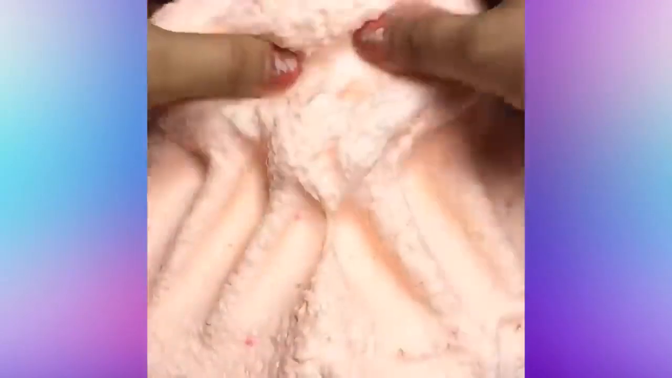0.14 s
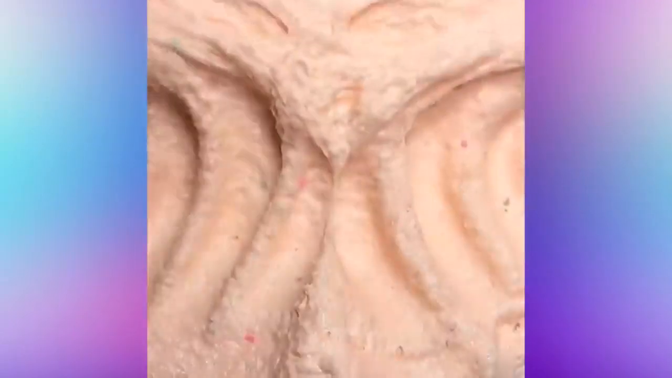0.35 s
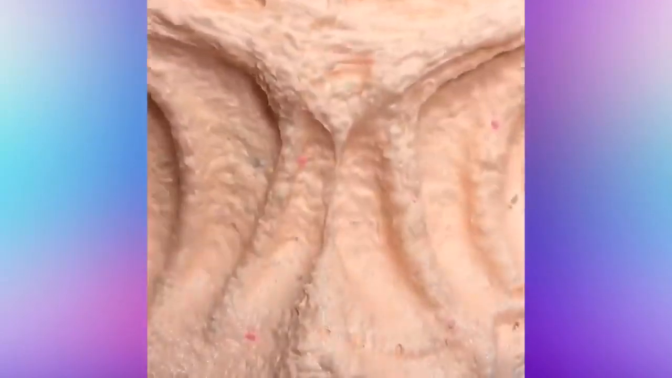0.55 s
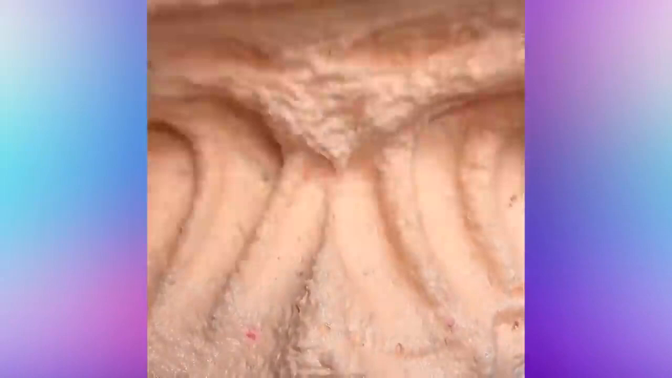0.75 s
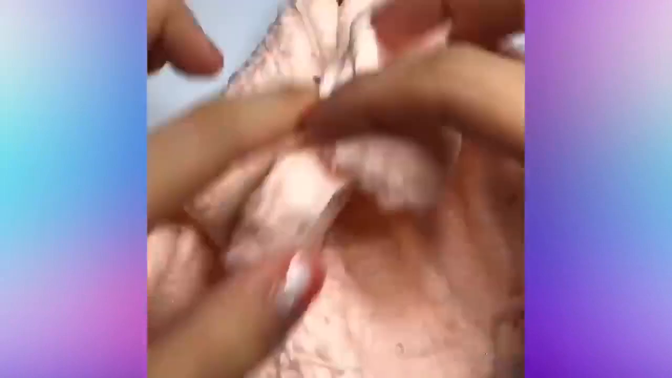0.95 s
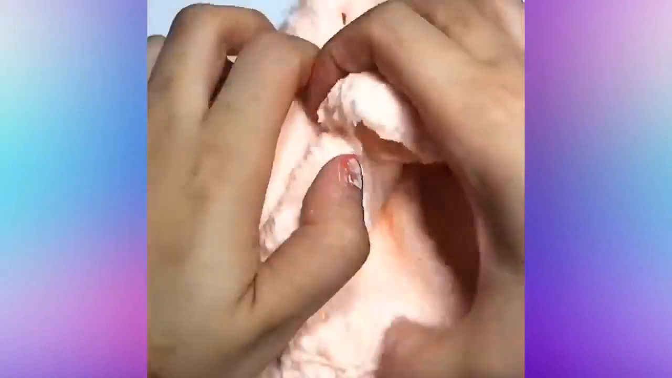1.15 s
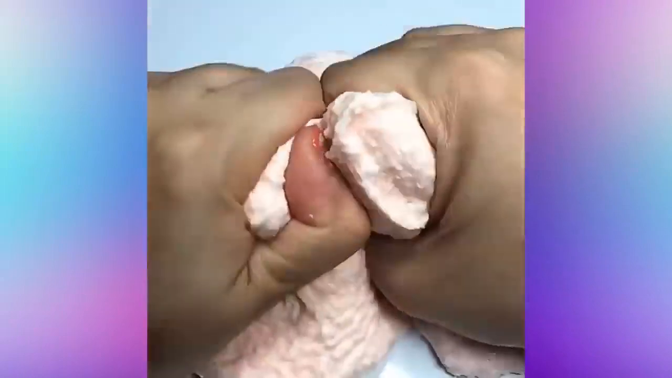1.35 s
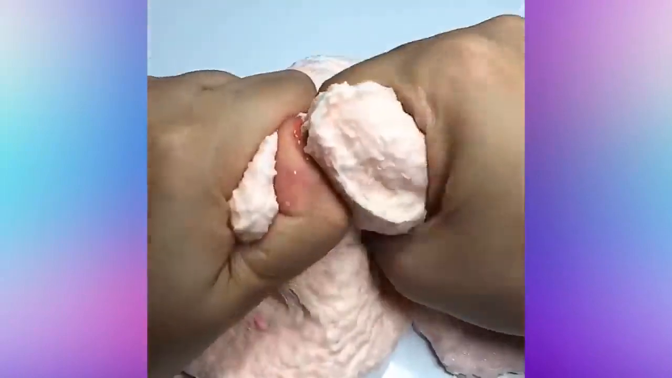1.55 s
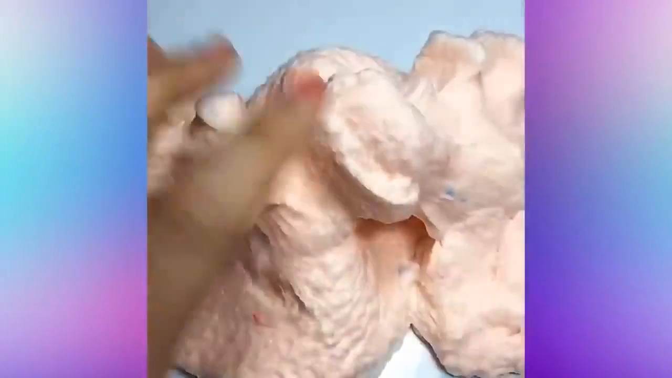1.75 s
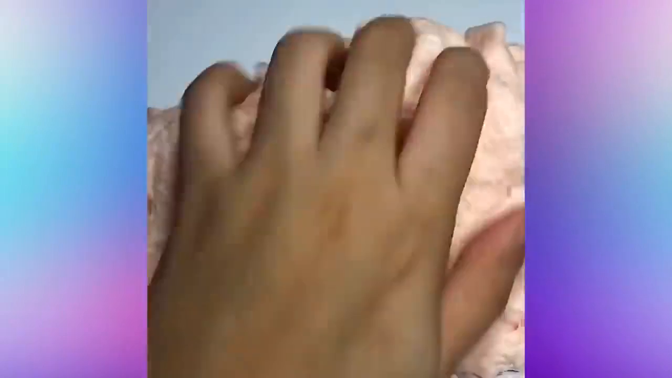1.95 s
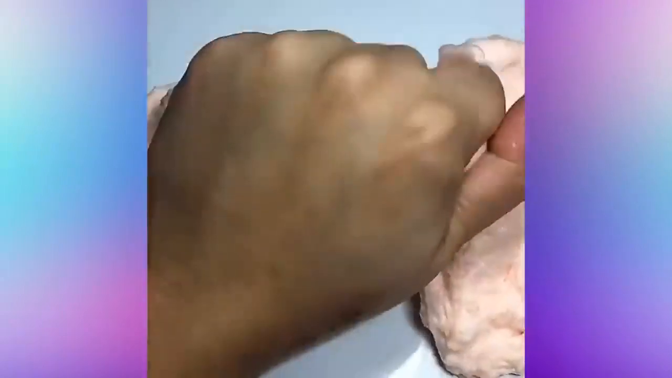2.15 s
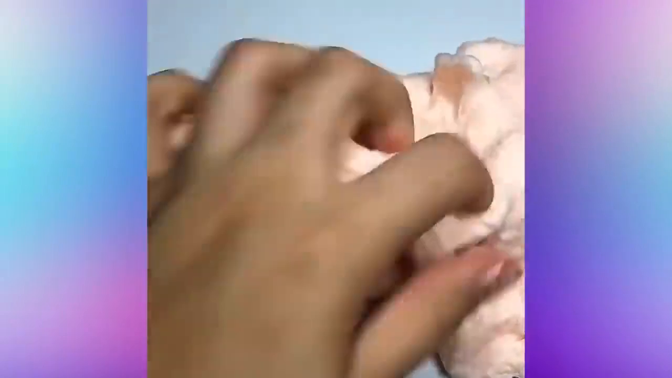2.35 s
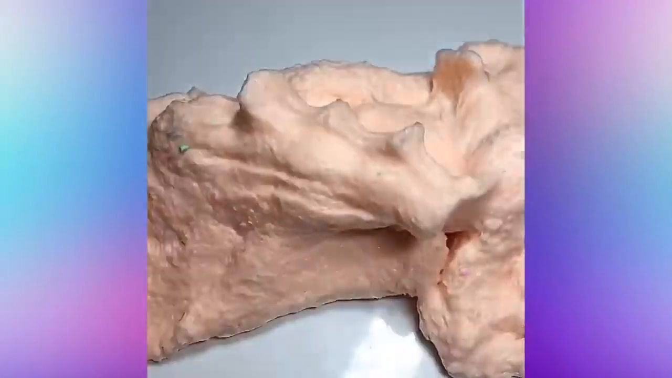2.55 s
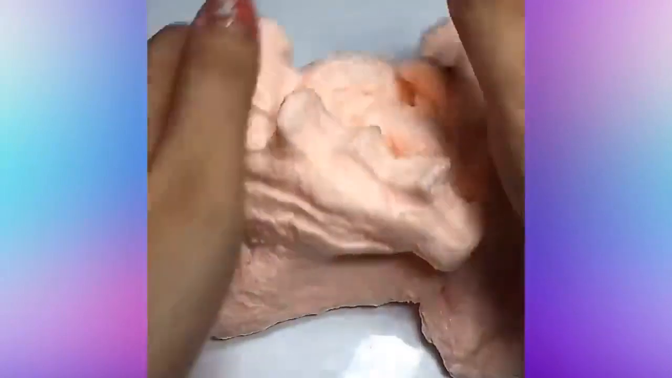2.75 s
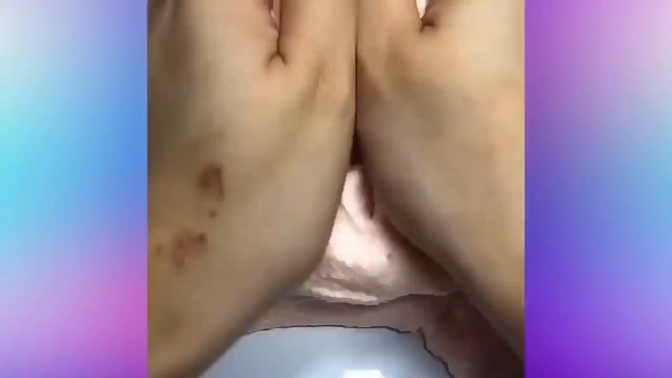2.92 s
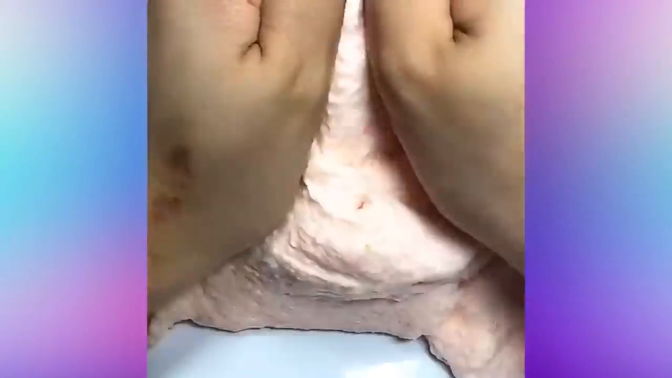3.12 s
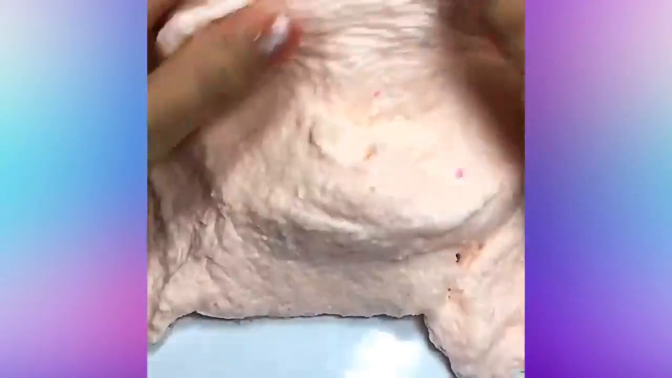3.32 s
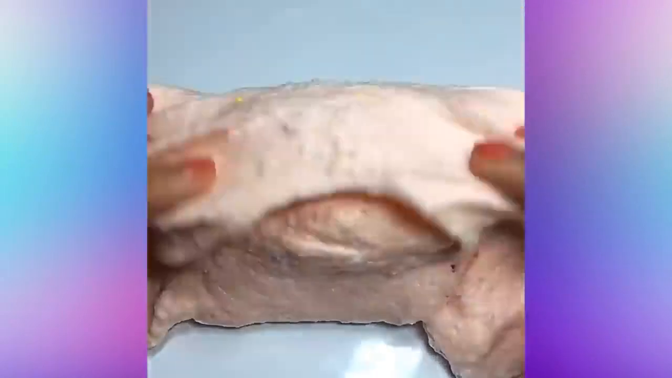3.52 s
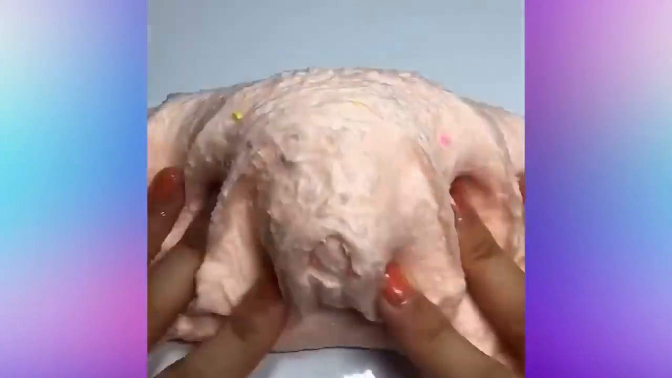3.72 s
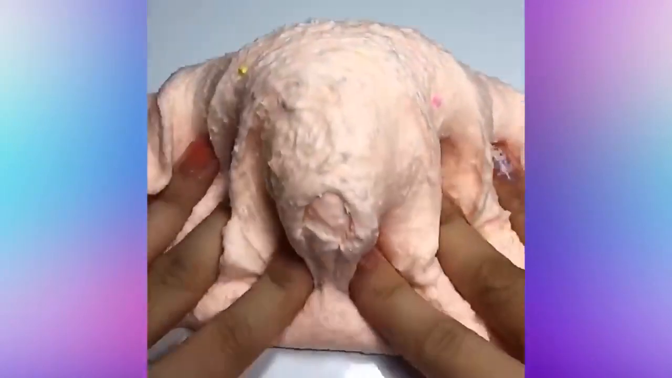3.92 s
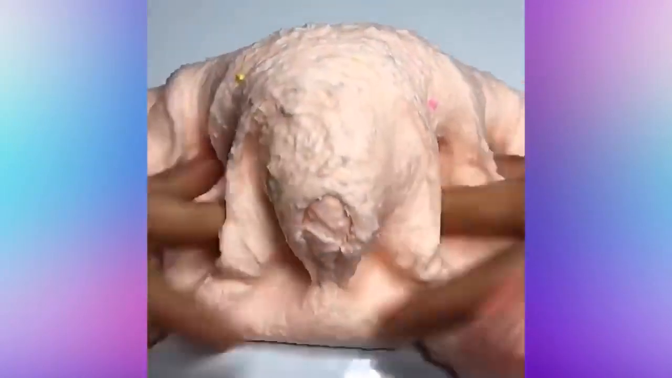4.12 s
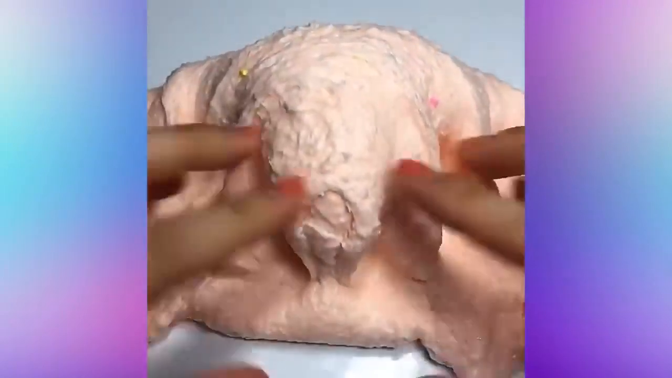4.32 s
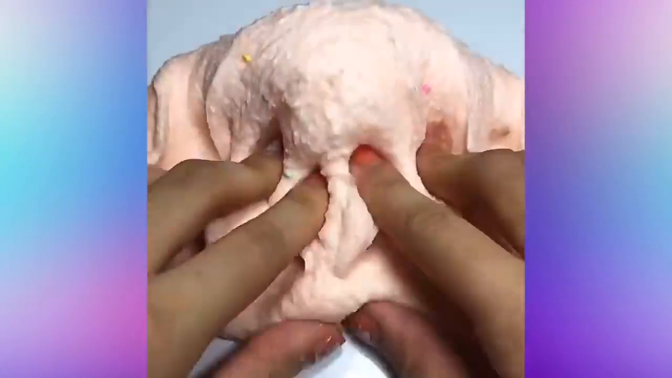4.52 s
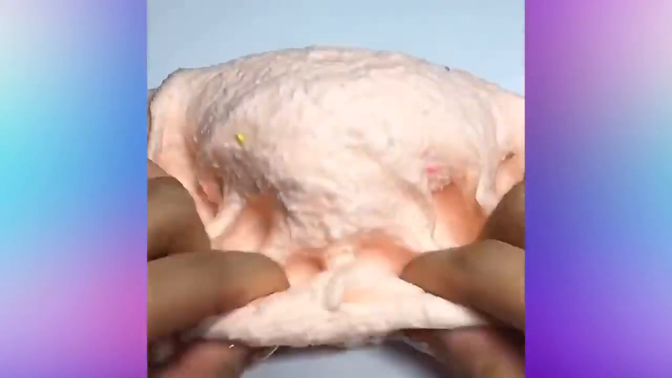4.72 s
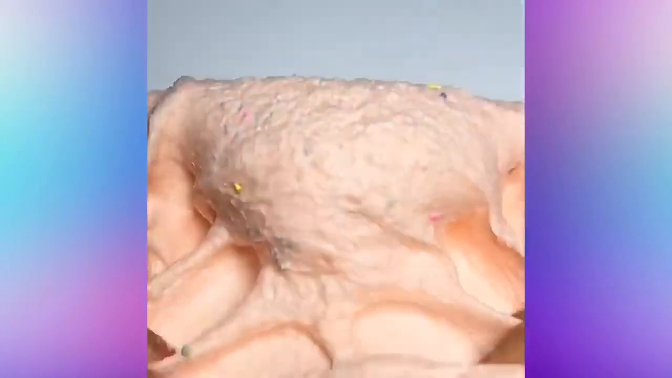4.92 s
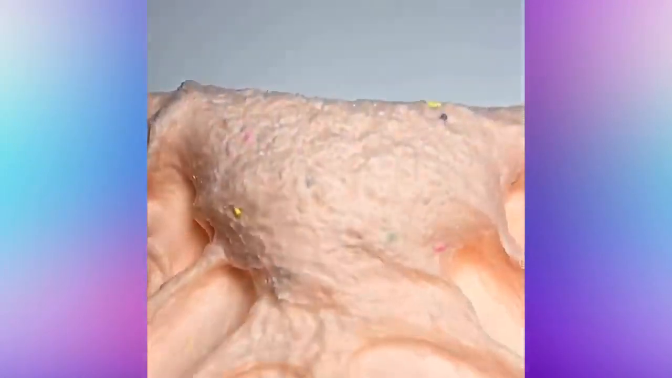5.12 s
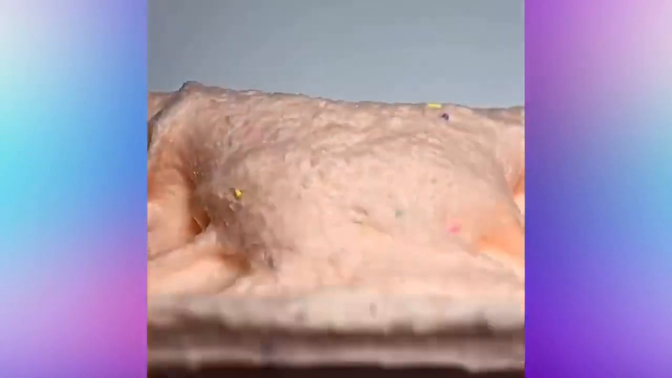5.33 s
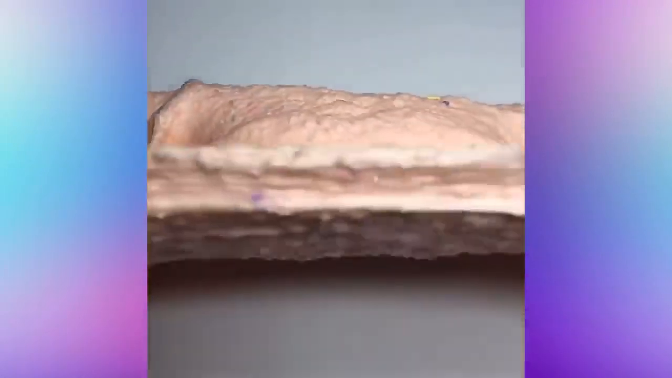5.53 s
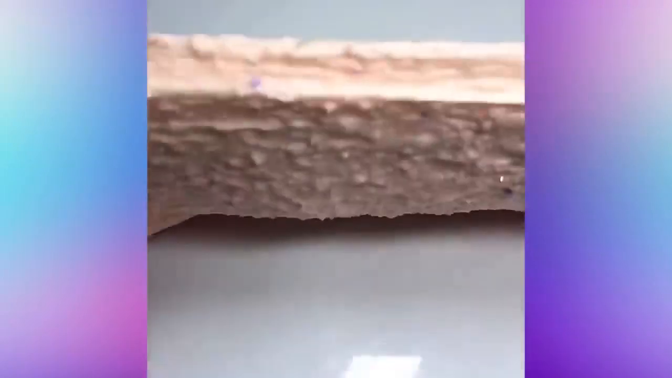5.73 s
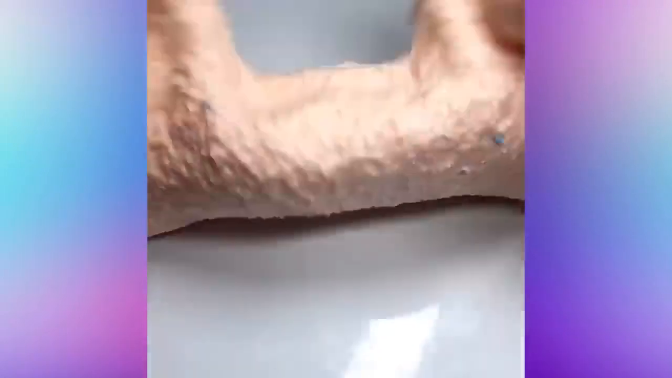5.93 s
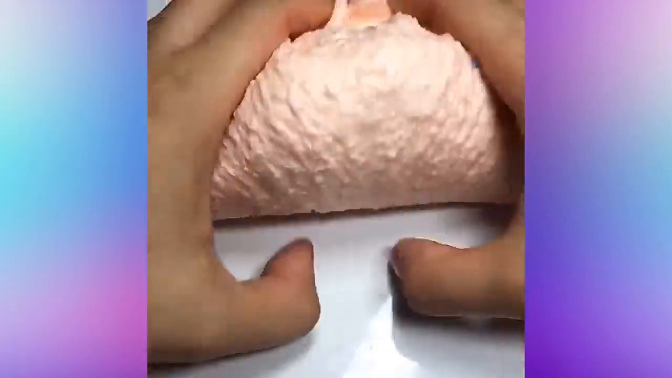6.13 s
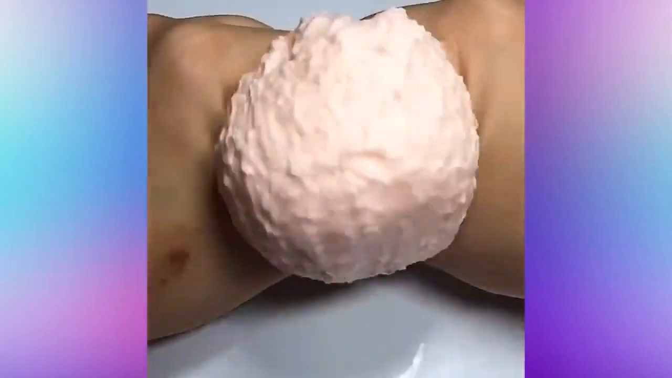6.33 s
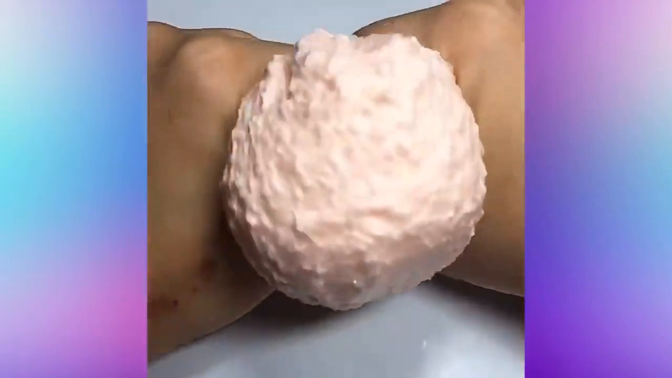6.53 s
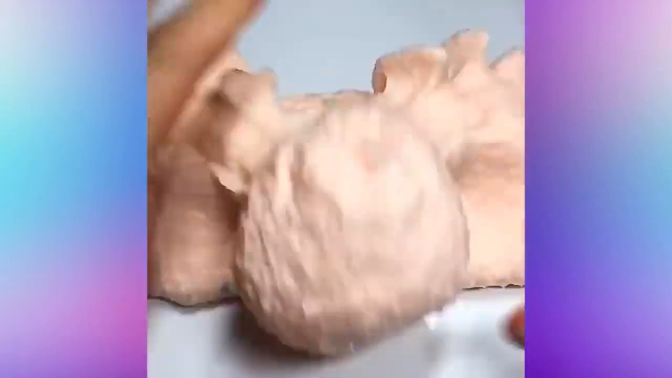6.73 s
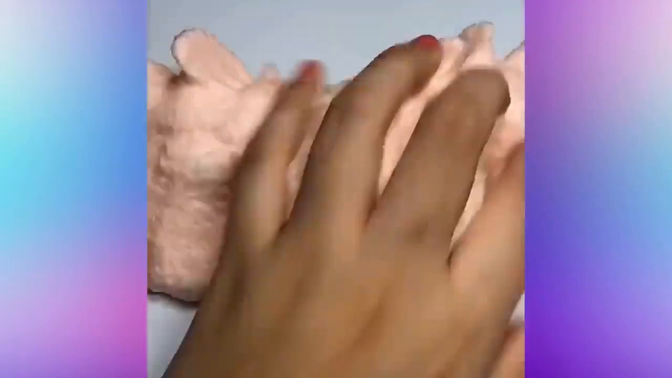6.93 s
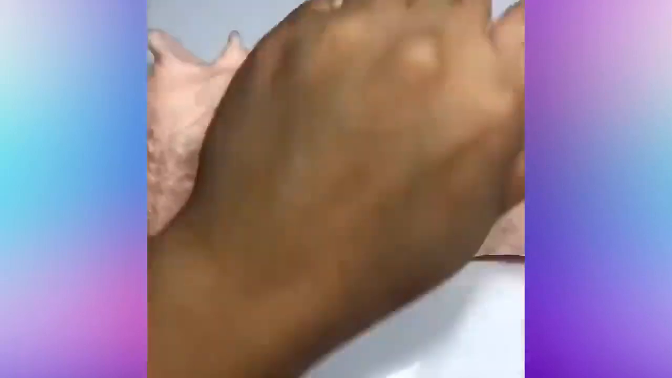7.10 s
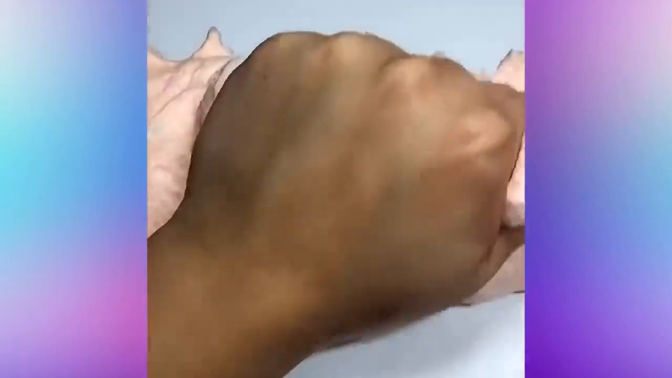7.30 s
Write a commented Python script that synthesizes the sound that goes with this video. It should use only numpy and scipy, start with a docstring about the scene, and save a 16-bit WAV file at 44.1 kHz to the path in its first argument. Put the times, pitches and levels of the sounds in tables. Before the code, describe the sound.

Very close to the microphone in a quiet room, two hands knead thick foamy slime on a table. Fine wet crackling swells and fades with each press and sticky peel. Soft pats open it, loud air pockets pop around one and a half seconds, smaller snaps and fizzing stretches follow, and a last cluster of overloaded pops comes near the end. A faint low hum lies underneath.

```python
"""Two hands knead thick, foamy slime on a table, close to a microphone in a quiet room.
Crackles of tiny ringing cells follow each press, stretch and peel off the skin.
Bubbles snap or open wetly as short rings; air pockets burst with a falling chirp, a buzz and a hiss.
Palms pat the mass with slap, cupped note and thud, and a fold of slime whistles softly.
Short reflections, faint noise and a hum surround it; the loudest bursts overload the microphone."""
import sys
import numpy as np
from scipy import signal
from scipy.fft import rfft, irfft, next_fast_len
from scipy.io import wavfile
from scipy.ndimage import uniform_filter1d, map_coordinates

SR = 44100
rng = np.random.default_rng(int(sys.argv[2]) if len(sys.argv) > 2 else 0)


def file_out(sig):
    """Save sig as 16-bit WAV at sys.argv[1]."""
    # one column per channel
    cols = np.atleast_2d(sig).T
    # limit, then scale
    lim = np.clip(cols, -1, 1)
    pcm = np.round(lim * 32767).astype(np.int16)
    wavfile.write(sys.argv[1], SR, pcm)


N = 328986

# Air pockets bursting: (time [s], cavity level [dB], open cavity pitch [Hz], relative rim level [dB],
# rim pitch [Hz], relative level of escaping air [dB], life before scaling [s])
AIR_POCKETS = [ (1.4593, -0.5, 234, -12, 2710, -8.5, 0.0073), (1.5035, -1.5, 303, -14, 1510, -12, 0.0018),
               (1.51, -10, 310, 0.5, 3280, -7, 0.0028), (1.6615, -2, 520, 0.5, 3170, 2, 0.0016),
               (2.2923, 1, 225, 3, 3850, 5, 0.0037), (2.3063, -16, 280, -2, 3330, -3, 0.004),
               (2.3635, -9, 275, -2, 3000, -8.5, 0.003), (3.2150, -19, 400, -30, 3430, -5, 0.0034),
               (3.2569, -14.5, 264, -11.5, 3070, -12.5, 0.0045), (3.3098, -39, 400, 0, 11800, -4, 0.0053),
               (3.3244, -18, 324, -27, 2600, -3, 0.003), (6.388, -1.5, 236, -0.5, 2810, -1.5, 0.0031),
               (6.4781, -10.5, 260, -34.5, 3530, -11, 0.0035), (6.5274, -6, 264, -15, 3070, -2.5, 0.0033),
               (6.6484, -6, 270, -24, 3765, 0, 0.0027), (6.7812, -30, 345, -8.5, 2540, -17, 0.0026),
               (7.2651, 1, 278, 6, 4170, -4, 0.0025), (7.3051, 7.5, 257, 8, 4800, 3.5, 0.002),
               (7.3152, 16, 240, -20, 1990, 11, 0.0024), (7.3263, -10, 327, -1, 3090, -10, 0.0063), ]
# Spectrum of air jetting out of a pocket or bubble: (frequency [Hz], relative level [dB])
AIR_JET = [(150, -21), (700, -10), (3200, -8), (6500, -5.5), (9000, -8.5), (14000, -3.5), (16000, -7)]


def amp(db):
    """Decibels to gain."""
    return 10 ** (np.asarray(db) / 20)


def unit(x):
    """Scale to rms 1."""
    return x / np.sqrt(np.mean(x ** 2) + 1e-20)


def add(track, s, sound):
    """Mix a sound into the track at time s."""
    part = track[max(0, round(s * SR)):][:len(sound)]
    part += sound[:len(part)]


def wobble(rate):
    """A smooth random curve, rate knots a second."""
    knots = rng.standard_normal(int(N * rate / SR) + 4)
    return map_coordinates(knots, [np.arange(N) * rate / SR])


def colour(x, points):
    """Shape x with a gain curve through (Hz, dB) points, then scale to rms 1."""
    size = next_fast_len(len(x) + 4096)
    hz, db = np.transpose(points)
    bins = np.fft.rfftfreq(size, 1 / SR)
    gain = amp(np.interp(np.log(bins + 1), np.log(hz), db))
    return unit(irfft(rfft(x, size) * gain, size)[:len(x)])


def noise(points, size):
    """Coloured noise of rms 1."""
    return colour(rng.standard_normal(size), points)


def swell(t, attack, life):
    """A quick rise and an exponential fall."""
    return (1 - np.exp(-t / attack)) * np.exp(-t / life)


def gate(start, hold, rise, release):
    """Samples of a gesture and its level in dB: 0 in the hold, 20 dB less per rise or release time away."""
    first = max(0, int((start - 2 * rise) * SR))
    last = min(N, int((start + hold + 2 * release) * SR))
    t = np.arange(first, last) / SR - start
    before, after = np.maximum(-t, 0), np.maximum(t - hold, 0)
    return slice(first, last), -20 * (before / rise + after / release)


def kneading():
    """Deep voids squelch, sticky threads let go of the skin and foam cells fizz, all in little avalanches."""
    # Spectra of the four cell sizes, deepest first: (frequency [Hz], relative level [dB])
    squelch_spectrum = [(60, -39), (140, 3.5), (220, -12), (300, 0), (420, -4), (650, 2), (850, -18),
                        (1500, -65)]
    tack_spectrum = [(300, -51), (600, -2.5), (760, -5), (1350, 2), (1800, 1.5), (2400, -0.5), (2900, 5.5),
                     (5000, -59)]
    fizz_spectrum = [(1200, -21.5), (2200, -7), (2600, -6.5), (3200, -0.5), (4000, 0.5), (5000, 1),
                     (6800, -1.5), (8000, -20.5), (12000, -53.5)]
    fine_spectrum = [(4000, -41), (6300, -8), (7200, -0.5), (9000, -1.5), (11000, 0), (14000, -2.5),
                     (16000, -22)]

    uneven_db, uneven_hz = 1.1, 18  # the mass yields unevenly
    squelch_gain, tack_gain, fizz_gain, fine_gain = effort() * amp(uneven_db * wobble(uneven_hz))
    settling = froth()
    squelch = cells(squelch_spectrum, rate=420, pitch_hz=377, cycles=2.93, spread_db=2.0, bed=0.73, size=1200)
    tack = cells(tack_spectrum, rate=1100, pitch_hz=1384, cycles=1.5, spread_db=2.0, bed=0.96, size=400)
    fizz = cells(fizz_spectrum, rate=1500, pitch_hz=4300, cycles=0.87, spread_db=1.7, bed=1.0, size=120)
    fine = cells(fine_spectrum, rate=2100, pitch_hz=9200, cycles=1.25, spread_db=2.5, bed=0.98, size=60)
    # Effort and settling froth add as powers.
    crackle = np.hypot(squelch_gain, amp(-5) * settling) * squelch
    crackle += np.hypot(tack_gain, amp(-5) * settling) * tack
    crackle += np.hypot(fizz_gain, settling) * fizz
    crackle += np.hypot(fine_gain, amp(4) * settling) * fine
    avalanches = unit(amp(0.7 * wobble(45) + 0.88 * wobble(260)))

    # Stray snaps and blips grow with the effort up to a cap, until a hard squeeze buries them.
    faint = ticks(rate=55, level_db=5, spread_db=9)
    clear = ticks(rate=8, level_db=13, spread_db=5)
    strays = np.minimum(fizz_gain, amp(-30)) * (faint + clear)
    blips = stray_blips(rate=11, level_db=9, spread_db=9, pitch_hz=1400)
    wet = np.minimum(tack_gain, amp(-30)) * blips
    return amp(-0.65) * patchy(avalanches * crackle, depth_db=2.0) + strays + wet


def effort():
    """Gains of squelch, tack, fizz and finest cells: pressing mostly crushes foam, peeling is wetter."""
    # The hands bear down, then ease off: (time [s], build-up [s], easing [s], crest level [dB],
    # growth to the crest [dB], drop after it [dB], wetness added to squelch and tack [dB],
    # finest cells over the fizz [dB])
    presses = [(0.175, 0.08, 0.57, -31, 13, 10.5, -0.5, -1.5),
               (0.866, 0.18, 0.17, -35.5, 5.5, 6, 0.5, -0.5), (1.205, 0.012, 0.091, -34, 4, 6.5, 3.5, -3.0),
               (1.306, 0.14, 0.23, -21, 11.5, 18, 0.5, -0.5), (1.982, 0.35, 0.087, -29.5, 13, 14.5, 1, 0.5),
               (2.778, 0.48, 0.17, -29.0, 5.0, 24, 2, -2.5), (3.571, 0.053, 0.51, -42.5, 0, -1.5, 3.5, 1.0),
               (4.515, 0.23, 0.24, -30.5, 10, 7, -1, -1.0), (5.0, 0.096, 1, -37.5, 3, 9, -1, -0.5),
               (5.96, 0.58, 0.22, -24, 21.0, 23.5, 0, -1.5), (7.092, 0.28, 0.1, -30.5, 10.5, 11.5, 5.5, -2)]
    # Sticky slime peels off the skin: (time at full speed [s], hold [s], rise [s], release [s],
    # fizz level [dB], tack over the fizz [dB], squelch over the fizz [dB])
    peels = [ (0.0, 0.01, 0.02, 0.025, -26, 0, 1.5), (0.384, 0.052, 0.26, 0.13, -38, 5, -12),
             (1.087, 0.014, 0.025, 0.068, -34, 5.5, -5.5), (1.747, 0.067, 0.055, 0.041, -21.5, 2, -0.5),
             (2.466, 0.093, 0.04, 0.03, -28, 1, -3), (3.466, 0.053, 0.14, 0.13, -26, -2, -6),
             (4.247, 0.074, 0.046, 0.029, -26.5, -2.5, -4.5), (4.891, 0.06, 0.046, 0.15, -33.5, 2.5, -8),
             (6.362, 0.03, 0.041, 0.079, -29, 1.5, -6.5), (6.795, 0.062, 0.037, 0.066, -23, 5.5, 2.5),
             (6.951, 0.032, 0.023, 0.016, -45, -1.5, -1.5), ]

    grip_s, let_go_s = 0.0081, 0.096  # a press starts and stops by 20 dB in these times
    press_tack_db, press_squelch_db = -4.5, -10.5  # over the fizz, before wetness
    peel_fine_db = -1  # finest cells over the fizz
    t, power = np.arange(N) / SR, np.zeros((4, N))
    for s, build, ease, db, growth, drop, wet, fine in presses:
        level = np.interp(t, [s, s + build, s + build + ease], [db - growth, db, db - drop])
        mix = amp([[press_squelch_db + wet], [press_tack_db + wet], [0], [fine]])
        span, shape = gate(s, build + ease, grip_s, let_go_s)
        power[:, span] += (mix * amp(level[span] + shape)) ** 2
    for s, hold, rise, release, db, tack, squelch in peels:
        mix = amp([[squelch], [tack], [0], [peel_fine_db]])
        span, shape = gate(s, hold, rise, release)
        power[:, span] += (mix * amp(db + shape)) ** 2
    return np.sqrt(power)


def froth():
    """Gain of the foam that goes on fizzing around a burst pocket, the more the more air it held."""
    start_db = -24  # over the table's air level, for a pocket of the reference life
    fall_s, reference_life_s = 0.086, 0.0057  # time to fall 20 dB; life that gives start_db
    power, t = np.zeros(N), np.arange(SR // 4) / SR
    for s, *_, air_db, life in AIR_POCKETS:
        gain = amp(air_db + start_db - 20 * t / fall_s) * life / reference_life_s
        add(power, s, gain ** 2)
    return np.sqrt(power)


def cells(spectrum, rate, pitch_hz, cycles, spread_db, bed, size):
    """A crackle of rms 1: tiny cells ring for a few cycles each, over a bed of unresolved ones."""
    count = int(rate * N / SR)
    when, pitch, strength = rng.random((count, 3)).T
    hz = pitch_hz * 2 ** (2 * pitch - 1)  # within an octave either way
    turns = hz[:, None] * np.arange(size) / SR
    gain = amp(spread_db * np.minimum(-np.log(1 - strength), 5))  # few cells are strong
    rings = gain[:, None] * np.sin(2 * np.pi * turns) * np.exp(-turns / cycles)
    index = (when * N).astype(int)[:, None] + np.arange(size)
    grains = np.bincount(index.ravel(), rings.ravel(), N)[:N]
    return colour(unit(grains) + bed * rng.standard_normal(N), spectrum)


def patchy(x, depth_db):
    """Neighbouring cells of like size give way together, so the colour shifts in small patches."""
    z = signal.stft(x, nperseg=1024)[2]
    field = rng.standard_normal(z.shape)
    field = uniform_filter1d(field, size=5, axis=0)  # over frequency
    field = uniform_filter1d(field, size=5, axis=1)  # over time
    gain = unit(amp(depth_db * unit(field)))
    return signal.istft(z * gain, nperseg=1024)[1][:N]


def ticks(rate, level_db, spread_db):
    """Stray bubble walls snap at random times, at random pitch and mostly near the lowest level."""
    out = np.zeros(N)
    for when, pitch, strength in rng.random((int(rate * N / SR), 3)):
        gain = amp(level_db + spread_db * strength ** 2)
        add(out, when * N / SR, gain * snap(2200 * 3.5 ** pitch))
    return out


def stray_blips(rate, level_db, spread_db, pitch_hz):
    """Small wet bubbles that open at random, all of much the same size."""
    when, pitch, strength = rng.random((int(rate * N / SR), 3)).T
    rows = zip(when * N / SR, level_db + spread_db * strength ** 2, pitch_hz * 1.5 ** (pitch - .5))
    return bubbles(rows, cycles=1.2, sink=0.9, attack=0.037)


def sheet():
    """Pores tear open in a stretched sheet, which rings in one broad band."""
    # Slime drawn out into a sheet: (time at full stretch [s], hold [s], rise [s], release [s],
    # level [dB], ring pitch [Hz], half-width [octaves])
    stretches = [ (2.156, 0.04, 0.048, 0.073, -29, 2850, 0.71),
                 (4.886, 0.061, 0.057, 0.16, -28.5, 2600, 0.78), (5.000, 0.49, 0.2, 0.2, -43.5, 1470, 0.31),
                 ]
    out = np.zeros(N)
    for s, hold, rise, release, db, hz, width in stretches:
        band = [(hz * 2 ** (k * width), -4 * k * k) for k in range(-4, 5)]
        pores = cells(band, rate=700, pitch_hz=hz, cycles=1.7, spread_db=2.5, bed=0.98, size=300)
        span, shape = gate(s, hold, rise, release)
        out[span] += amp(db + shape) * pores[span]
    return out


def snaps():
    """The clearest small bubbles snap at the surface, one by one."""
    # (time [s], relative level [dB], pitch [Hz])
    clear_snaps = [ (0.544, -17, 4330), (1.1074, -11.5, 2900), (1.3348, -9, 3550), (1.4411, 1, 4070),
                   (1.498, -5, 3170), (1.5347, -13, 2820), (1.57, 4.5, 2920), (1.589, 0.5, 2880),
                   (1.6502, -9, 2860), (2.2630, -14, 3180), (2.272, -9, 3200), (3.0939, 3.5, 4890),
                   (3.1694, -8, 5280), (3.2023, -6, 7430), (3.938, -8, 5160), (4.0033, -15, 6540),
                   (4.1902, -15.5, 6670), (4.6366, -9, 6600), (4.7410, -14, 3990), (4.8052, -1, 5070),
                   (5.1397, -5, 3780), (5.29, -10, 5800), (5.5948, -6, 3920), (5.8238, -15, 3440),
                   (5.8434, -22, 3300), (6.316, -5.5, 4740), (6.4504, -3, 6380), (6.499, -7, 4280),
                   (6.5885, -13.5, 5340), (7.4057, -6.5, 3220), ]
    out = np.zeros(N)
    for s, db, hz in clear_snaps:
        add(out, s + .0008, amp(db + 2.0) * snap(hz))
    return out


def snap(hz):
    """A thin bubble wall tears: a couple of cycles, then a short scatter off hands and table."""
    t = np.arange(SR // 40) / SR
    ring = 1.25 * np.sin(2 * np.pi * hz * t) * swell(t, .00006, 0.00027)
    tear = 0.37 * np.exp(-t / 0.00085) * noise(AIR_JET, len(t))
    scatter_spectrum = [(400, -30), (1300, -2.5), (3500, -1), (7000, 0), (14000, -8)]
    scatter = 0.16 * swell(t, 0.001, 0.0027) * noise(scatter_spectrum, len(t))
    return ring + tear + scatter


def pockets(closed_hz, opening, emptying):
    """A pocket tears open: its rim buzzes, the cavity's note plunges as it widens, and the air hisses out."""
    out, t = np.zeros(N), np.arange(SR // 16) / SR
    for s, cavity_db, open_hz, rim_db, rim_hz, air_db, life in AIR_POCKETS:
        pressure = np.exp(-(t / (1.39 * life)) ** emptying)  # holds a moment, then collapses
        cavity_hz = open_hz + closed_hz * np.exp(-t / opening)
        cavity = np.sin(2 * np.pi * np.cumsum(cavity_hz) / SR) * swell(t, 0.00073, 1.26 * life)
        flutter = 0.13 * noise([(30, -8), (700, -3), (2500, -26.5)], len(t))
        rim = np.sin(2 * np.pi * np.cumsum(rim_hz * (1 + flutter)) / SR)
        jet = noise(AIR_JET, len(t))
        escape = pressure * (amp(rim_db - 4.0) * rim + amp(air_db - 2.0) * jet)
        add(out, s, amp(cavity_db) * cavity + escape)
    return out


def bubbles(table, cycles, sink, attack):
    """Each bubble rings for a few cycles, its note sinking as its mouth widens."""
    out, t = np.zeros(N), np.arange(SR // 16) / SR
    for s, db, hz in table:
        life = cycles / hz
        # from sink octaves above hz towards as many below
        note_hz = hz * 2 ** (sink * (2 * np.exp(-t / life) - 1))
        ring = np.sin(2 * np.pi * np.cumsum(note_hz) / SR) * swell(t, attack * life, life)
        add(out, s, amp(db) * ring / np.abs(ring).max())
    return out


def pats(thud_life, air_life, slap_life):
    """Palms and fingers land: a soft slap, a cupped note that sinks, and the mass's dead thud on the table."""
    # (time [s], relative thud level [dB], thud pitch [Hz], relative level of trapped air [dB],
    # settled pitch of trapped air [Hz], relative slap level [dB])
    landings = [ (0.1766, -14, 122, -14.5, 392, -10.5), (1.2150, -31, 94, -62, 286, -32),
                (1.824, -26.5, 55.3, -36, 250, -48), (2.7132, -23, 98, -15, 427, -13.5),
                (2.799, -24.5, 84.6, -23, 700, -20), (4.5530, -28, 112, -29, 307, -29),
                (6.2467, -16, 100, -11.5, 344, -19), (7.0925, -40, 116.4, -22, 355, -24),
                (7.321, -22.5, 86, -20, 423, -36), ]
    # The mass quivering on the table: (frequency [Hz], relative level [dB])
    thud_spectrum = [(30, -24), (65, -7), (130, 5.5), (220, -4.5), (450, -15), (1200, -60)]
    # Skin slapping the surface: (frequency [Hz], relative level [dB])
    slap_spectrum = [(100, -5), (500, -10.5), (1400, -12), (3000, -20), (7000, -18.5), (14000, -31)]
    out, t = np.zeros(N), np.arange(SR // 5) / SR
    for s, thud_db, thud_hz, air_db, air_hz, slap_db in landings:
        quiver = 0.38 * noise(thud_spectrum, len(t))
        thud = (0.69 * np.sin(2 * np.pi * thud_hz * t) + quiver) * swell(t, 0.003, thud_life)
        sinking_hz = air_hz * (1 + 1.79 * np.exp(-t / 0.00159))
        cup = np.sin(2 * np.pi * np.cumsum(sinking_hz) / SR) * swell(t, 0.003, air_life)
        slap = noise(slap_spectrum, len(t)) * swell(t, 0.0015, slap_life)
        add(out, s, amp(air_db + 1.0) * cup + amp(slap_db - 3.0) * slap)
        add(out, s + 0.00635, amp(thud_db + 6.0) * thud)  # the table is reached a moment later
    return out


def fold(width_hz):
    """Air forced through a narrowing fold excites a narrow resonance whose pitch glides, rising overall."""
    # (time [s], level [dB], resonance [Hz])
    glide = [(0.24, -59, 461), (0.27, -33, 421), (0.295, -32.5, 340), (0.32, -50, 362), (0.35, -35, 434),
             (0.39, -31, 524), (0.416, -38, 634), (0.437, -32, 758), (0.48, -45, 846)]
    s, db, hz = np.transpose(glide)
    t = np.arange(N) / SR
    phase = 2 * np.pi * np.cumsum(np.interp(t, s, hz)) / SR
    # Slow noise on a sine and a cosine makes a narrow band around the gliding pitch.
    flutter = [(width_hz / 2, 0), (width_hz, -4), (4 * width_hz, -26), (20 * width_hz, -80)]
    whistle = noise(flutter, N) * np.sin(phase) + noise(flutter, N) * np.cos(phase)
    return amp(np.interp(t, s, db, left=-120, right=-120)) * whistle


def reflections(x, wet_db, life):
    """The table and near walls return a short, weak tail."""
    t = np.arange(SR // 6) / SR
    spectrum = [(100, 2), (400, 1.0), (4000, -2.0), (14000, -0.5)]
    tail = noise(spectrum, len(t)) * swell(t, 0.0012, life)
    return amp(wet_db) * signal.fftconvolve(x, tail / np.linalg.norm(tail))[:N]


def room():
    """Faint room noise and the wavering hum of an appliance, with a weak octave."""
    # Room noise: (frequency [Hz], relative level [dB])
    room_spectrum = [(20, -26.5), (36, -31.5), (52, -8), (75, -7), (140, -4.5), (230, -11.5), (450, -14.5),
                     (800, -20.5), (2250, -27.5), (10700, -32), (14000, -40)]
    noise_db = -46.5
    hum_hz, hum_db, waver_db = 64.5, -46, 1.5
    t = np.arange(N) / SR
    phase = 2 * np.pi * hum_hz * t + 0.18 * wobble(2.2)
    hum = amp(hum_db + waver_db * wobble(2.32)) * np.sin(phase)
    octave = amp(-58.5) * np.sin(2 * phase)
    return amp(noise_db) * noise(room_spectrum, N) + hum + octave


def scene():
    """Slime, hands and room, in mono."""
    # Wet bubbles opening under the skin of the mass: (time [s], peak level [dB], middle pitch [Hz])
    blips = [(0.4335, -16, 770), (1.7526, -6, 1680), (3.0009, -16, 1630), (3.1474, -21, 1630),
             (3.9002, -20, 1460), (4.0704, -23.5, 1800), (4.7596, -18, 1110), (6.2467, -11, 1100),
             (6.3170, -13.5, 1690), (7.1441, -18.5, 1520)]
    # Air shoved between voids deep in the mass: (time [s], peak level [dB], middle pitch [Hz])
    gulps = [(0.1570, -24, 260), (0.1830, -11, 268), (1.7560, -16, 246), (2.4920, -20, 296),
             (2.4960, -17, 580), (2.7165, -15.5, 465), (4.2680, -17, 293), (4.2890, -18, 272),
             (4.3150, -16.5, 310), (4.3340, -20.5, 312), (7.3400, -11.5, 322)]
    slime = kneading() + sheet() + fold(width_hz=120)
    bursts = snaps() + pockets(closed_hz=2520, opening=0.001414, emptying=1.44)
    wet = bubbles(blips, cycles=1.55, sink=1.0, attack=0.04)
    wet += bubbles(gulps, cycles=1.56, sink=0.57, attack=0.058)
    palms = pats(thud_life=0.014, air_life=0.0084, slap_life=0.0078)
    blows = bursts + wet + palms
    mix = slime + blows + reflections(blows, wet_db=-14.5, life=0.028) + room()
    return mix[None]


def record(dry):
    """The microphone saturates on the loudest bursts and keeps next to nothing above its band limit."""
    ceiling, top_hz = .7, 14100
    clipped = dry / (1 + np.abs(dry / ceiling) ** 6) ** (1 / 6)
    size = next_fast_len(N + SR // 10)
    hz = np.fft.rfftfreq(size, 1 / SR)
    band_limit = 1 / np.sqrt(1 + (hz / top_hz) ** 200)
    return irfft(rfft(clipped, size) * band_limit, size)[:, :N]


dry = scene()
out = record(dry)
file_out(out)
```